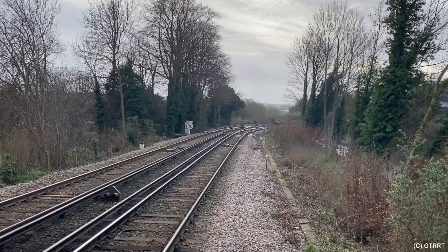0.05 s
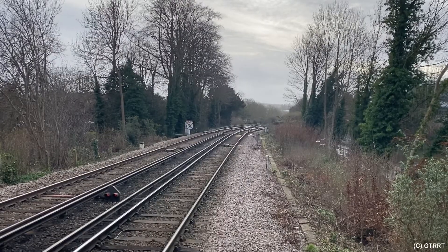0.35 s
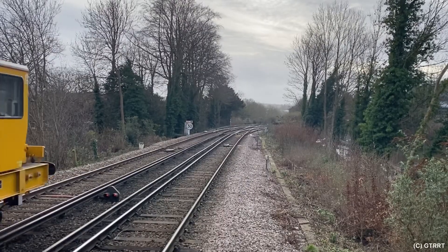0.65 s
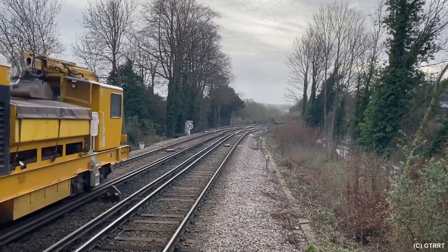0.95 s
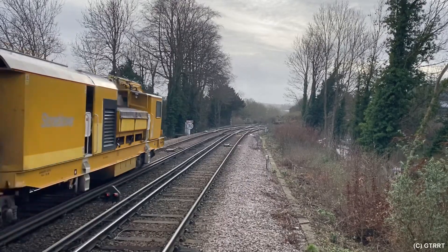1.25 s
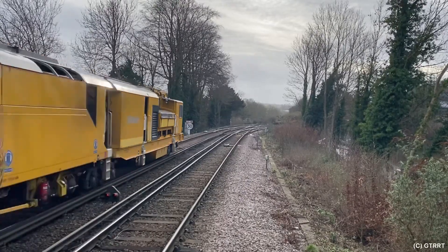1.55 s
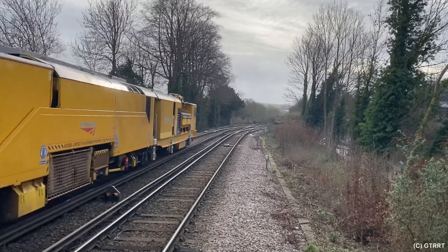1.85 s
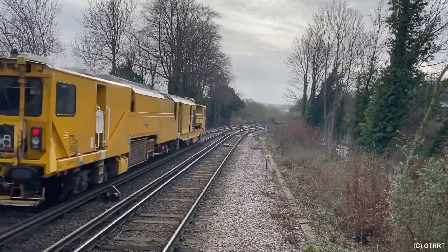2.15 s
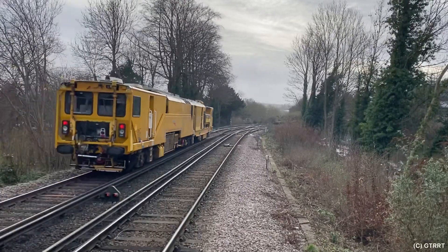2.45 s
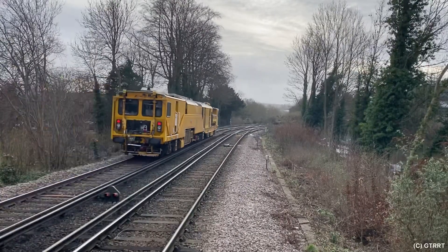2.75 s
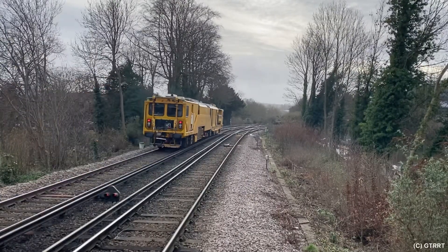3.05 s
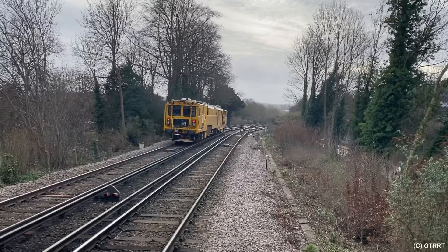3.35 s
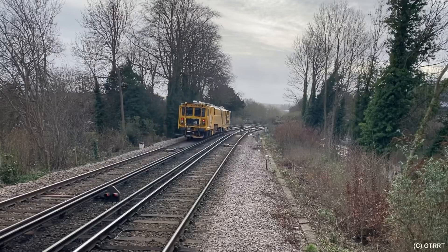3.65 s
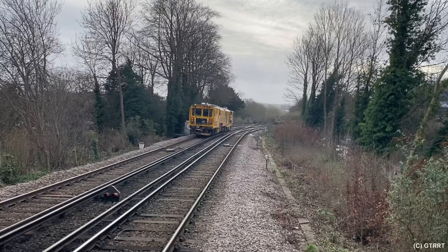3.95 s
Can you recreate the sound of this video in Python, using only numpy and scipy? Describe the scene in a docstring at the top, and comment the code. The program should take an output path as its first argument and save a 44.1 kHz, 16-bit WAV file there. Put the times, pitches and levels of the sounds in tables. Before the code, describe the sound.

A heavy train rumbles past close by with clattering wheels, then fades into the distance.

```python
"""A passing track maintenance train

Wheels roar and hiss on rough rails and thump over joints as the train passes a phone and runs away.
The diesel and its cooling fan sink in pitch by the Doppler effect. A sharp hiss spits out at the
first bogie, the wheel flanges squeal briefly from friction, and steel clacks far down the line."""
import sys
import numpy as np
from scipy import signal
from scipy.fft import rfft, irfft, next_fast_len
from scipy.io import wavfile
from scipy.ndimage import uniform_filter1d, map_coordinates

SR = 44100
rng = np.random.default_rng(int(sys.argv[2]) if len(sys.argv) > 2 else 0)


def wrap_up_sound(samples):
    """Save the sound to the file named by the first command line argument, as 16-bit audio."""
    columns = np.atleast_2d(samples).T
    # keep every value between -1 and 1, then stretch to whole-number steps
    tamed = np.clip(columns, -1, 1)
    steps = np.round(tamed * 32767).astype(np.int16)
    wavfile.write(sys.argv[1], SR, steps)


N = 176400

# spectrum of the spitting hiss and the steel ticks (frequency [Hz], level [dB])
BRIGHT_SPECTRUM = [(500, -29), (1200, 2.5), (5500, 2.5), (15500, -7)]


def amp(db):
    """Decibels to amplitude ratio."""
    return 10 ** (np.asarray(db) / 20)


def unit(x):
    """Normalisation to rms 1."""
    return x / np.sqrt(np.mean(np.abs(x) ** 2) + 1e-20)


def seconds():
    """The time of each sample."""
    return np.arange(N) / SR


def along(points, hz):
    """Interpolation of (frequency [Hz], value) points on a logarithmic axis."""
    f, v = np.transpose(points)
    return np.interp(np.log(hz + 1), np.log(f + 1), v)


def curve(points):
    """Linear interpolation of (time [s], value) points at each sample."""
    return np.interp(seconds(), *np.transpose(points))


def wobble(rate):
    """Smooth random modulation with rate knots a second."""
    return map_coordinates(rng.standard_normal(4096), [seconds() * rate], mode="wrap")


def filtered(x, response):
    """Linear filtering: the spectrum of x times a frequency response."""
    m = next_fast_len(N + 8192)
    return irfft(rfft(x, m) * response(np.fft.rfftfreq(m, 1 / SR)), m)[..., :N]


def rush(spectrum, patchy_db):
    """Coloured noise, direct and scattered, modulated in random patches of time and frequency."""
    bins = signal.stft(rng.standard_normal((2, N)), nperseg=1024)[2]
    patches = uniform_filter1d(rng.standard_normal(bins.shape[1:]), size=4, axis=0)
    patches = uniform_filter1d(patches, size=10, axis=1)
    pair = signal.istft(bins * amp(patchy_db * unit(patches)), nperseg=1024)[1][:, :N]
    return unit(filtered(pair, lambda hz: amp(along(spectrum, hz))))


def tone(hz, rough, width_hz):
    """A partial, direct and scattered; rough is the share of its power in narrow-band noise."""
    flutter = np.array([unit(wobble(width_hz) + 1j * wobble(width_hz)) for _ in range(2)])
    clean = np.array([[1], [1j]]) * np.exp(2j * np.pi * rng.random())
    carrier = np.exp(2j * np.pi * np.cumsum(hz) / SR)
    return unit(np.real((np.sqrt(1 - rough) * clean + np.sqrt(rough) * flutter) * carrier))


def burst(start, attack, hold, decay):
    """Linear attack, hold, then exponential damping by 60 dB in the decay time; all in seconds."""
    t = seconds() - start
    return np.clip(t / attack, 0, 1) * amp(-60 * np.maximum(t - attack - hold, 0) / decay)


def steady(x):
    """Division by the running rms evens out the chance swells of noise."""
    return x / np.sqrt(np.abs(uniform_filter1d(x ** 2, size=300, axis=-1)) + 1e-20)


def near_and_far():
    """Equal-power gains for the train heard from the side and, once its tail passes, from behind."""
    tail_s, fade_s = 2.02, .3
    turn = np.pi / 4 * (1 + np.tanh((seconds() - tail_s) / fade_s))
    return np.cos(turn), np.sin(turn)


def doppler():
    """Doppler effect: the frequency ratio falls as the engine bay approaches, passes and recedes."""
    abreast_s, distance_m = 1.05, 7.5
    speed, sound_speed = 25, 343  # m/s
    position_m = speed * (seconds() - abreast_s)
    return 1 / (1 + speed / sound_speed * position_m / np.hypot(position_m, distance_m))


def rolling():
    """Rail roughness excites broadband noise: ground rumble, wheel roar, rail hiss and fine fizz."""
    # spectral densities (frequency [Hz], level [dB])
    rumble_spectrum = [(10, -55), (25, -12), (42, -4), (62, 7.5), (85, 0), (125, 1), (165, -3), (320, -56)]
    near_spectrum = [(110, -42), (190, -2), (400, -2), (600, -2.5), (800, -4.5), (950, -8), (1250, -6.5),
                     (1700, -13), (2400, -15), (4200, -63)]
    far_spectrum = [(110, -41), (190, -3.5), (380, -2), (640, -4), (800, -7), (930, -10), (1600, -10),
                    (2200, -13), (2500, -22.5), (4000, -87)]
    hiss_spectrum = [(1700, -39), (2700, 1.5), (3600, -3), (7000, -7.5), (8500, -19.5), (11500, -65)]
    fizz_spectrum = [(5500, -37), (7800, -2), (9800, 4.5), (11000, -2.5), (13000, -7), (15500, -13.5)]
    # envelopes (time [s], level [dB])
    rumble_level = [(0, -22), (.3, -20.5), (.6, -26), (.9, -23), (1.3, -28), (1.9, -28.5), (2.4, -33.5),
                    (2.8, -34), (3.2, -37.5), (4, -40)]
    roar_level = [(0, -17), (.65, -16.5), (1.15, -17.5), (1.4, -20), (1.9, -21.5), (2.05, -26.5),
                  (2.4, -28), (2.7, -29), (3, -33.5), (3.3, -31), (3.6, -34.5), (4, -35)]
    hiss_level = [(0, -30), (1.17, -30.5), (1.45, -34), (1.85, -35.5), (2.4, -45.5), (2.7, -45.5),
                  (3, -47.5), (4, -52.5)]
    fizz_level = [(0, -48.5), (.22, -44.5), (.55, -37.5), (.66, -45), (.87, -40.5), (1.18, -37),
                  (1.45, -43), (1.95, -45), (2.08, -51.5), (2.5, -54.5), (4, -65.5)]
    near, far = near_and_far()
    shake = wobble(34.6)  # the rough rail makes the level flicker
    rumble = rush(rumble_spectrum, patchy_db=1) * amp(curve(rumble_level))
    roar = near * rail_resonance(rush(near_spectrum, patchy_db=1.43))
    roar += far * rail_resonance(rush(far_spectrum, patchy_db=1.43))
    roar *= amp(curve(roar_level) + .42 * shake)
    hiss = rush(hiss_spectrum, patchy_db=2.5) * amp(curve(hiss_level) + .5 * shake)
    fizz = rush(fizz_spectrum, patchy_db=3) * amp(curve(fizz_level) + .5 * shake + .37 * wobble(200))
    return rumble + roar + hiss + fizz


def rail_resonance(x):
    """Resonance: wheels and rails reinforce narrow bands around their natural frequencies."""
    # modes (frequency [Hz], half width [Hz], lift [dB])
    modes = [(262, 5.9, 3.5), (378, 17, 3), (807, 16, 5), (2445, 33, 5)]
    lift_db = lambda hz: sum(db / (1 + ((hz - centre) / width) ** 2) for centre, width, db in modes)
    return unit(filtered(x, lambda hz: amp(lift_db(hz))))


def thumps():
    """Impact excitation: each rail joint shakes the bogie into a damped band of noise."""
    # blows (time [s], level [dB], band centre [Hz], decay [s])
    joints = [(0.048, -11, 260, 0.13), (0.155, -10, 400, 0.065), (0.17, -8.5, 520, 0.066),
              (0.239, -12.5, 455, 0.12), (.29, -10, 270, 0.21), (0.355, -12, 650, 0.067),
              (0.41, -9, 580, 0.11), (.486, -11, 410, 0.098), (0.535, -10, 640, 0.031),
              (2.604, -23.5, 400, 0.027), (3.153, -26, 500, 0.27), (3.236, -30, 696, 0.12)]
    # response of the bogie (frequency [Hz], level [dB])
    bogie = [(50, -16), (150, -14.5), (250, 8), (420, -1), (1150, -1), (1700, -18.5), (9000, -57)]
    half_width_octaves = 1.22
    out = np.zeros((2, N))
    for start, db, centre_hz, decay in joints:
        detuning = lambda hz: np.log2((hz + 1) / centre_hz) / half_width_octaves
        colour = lambda hz: amp(along(bogie, hz)) / (1 + detuning(hz) ** 2)
        envelope = burst(start, attack=.0029, hold=.0085, decay=decay)
        blow = steady(filtered(rng.standard_normal((2, N)), colour)) * envelope
        out += amp(db) * blow * np.linalg.norm(envelope) / np.linalg.norm(blow, axis=1, keepdims=True)
    return out


def diesel():
    """Periodic firing makes a drone of low partials, lowered in passing by the Doppler effect."""
    # partials (multiple of the base frequency, level [dB], roughness [0-1])
    orders = [(2 / 3, -8.5, 0.23), (0.98, 0, 0.16), (8 / 3, -13, 0.54)]
    # envelope (time [s], level [dB])
    level = [(0, -23.5), (.35, -21.5), (.55, -31), (1.08, -18.5), (1.3, -24), (1.9, -38), (2.45, -54.5),
             (2.9, -39), (4, -40)]
    base_hz = 100.56 * doppler()
    drone = sum(amp(db) * tone(k * base_hz, rough, width_hz=22) for k, db, rough in orders)
    return drone * amp(curve(level))


def cooling_fan():
    """The fan whines at harmonics of its Doppler-shifted blade-passing frequency."""
    # partials (harmonic number, level [dB], roughness [0-1])
    harmonics = [(1, -6, 0.22), (2, -0.5, 0.49)]
    # envelope (time [s], level [dB])
    level = [(.6, -49), (1.05, -19.5), (1.62, -21.5), (1.75, -26), (2.15, -31.5), (2.4, -44), (2.58, -36.5),
             (4, -49.5)]
    blade_hz = 392.6 * doppler()
    whine = sum(amp(db) * tone(k * blade_hz, rough, width_hz=95) for k, db, rough in harmonics)
    return whine * amp(curve(level))


def squeals():
    """Friction: a flange grips and holds a note; a rough note is wider and rasps an octave higher."""
    # notes (time [s], hold [s], frequency at rest [Hz], level [dB], roughness [0-1])
    notes = [(0.818, 0.074, 5890, -35, 1), (0.938, 0.094, 1905, -28.5, 0.57),
             (1.025, .09, 1553, -30.5, 0.2), (1.071, .11, 1942, -25, .35), (1.225, 0.048, 1942, -34, .3),
             (1.298, 0.12, 1936, -25.5, 0.34), (1.584, 0.22, 1945, -34, 0.83),
             (2.189, 0.032, 2290, -27, 0.99)]
    width_hz, rasp_db = 340, -14
    glide, out = doppler(), np.zeros((2, N))
    for start, hold, hz, db, rough in notes:
        rasp = rough * amp(rasp_db) * tone(2 * hz * glide, 1, 2 * width_hz)
        note = tone(hz * glide, rough, rough * width_hz)
        out += amp(db) * (note + rasp) * burst(start, attack=.0069, hold=hold, decay=.15)
    return out


def spit():
    """A broadband transient: bright hiss spits from the wheels as the first bogie passes."""
    envelope = burst(start=.27, attack=.008, hold=.043, decay=.41)
    return amp(-23) * rush(BRIGHT_SPECTRUM, patchy_db=-3.5) * envelope


def clacks():
    """Free vibration after impact: distant steel ticks and rings in damped inharmonic modes."""
    # strikes (time [s], ring level [dB], tick level [dB], tick cutoff [Hz])
    strikes = [(3.161, -31.5, -33.5, 3320), (3.239, -23.5, -38, 2500), (3.245, -32, -37, 9000)]
    # modes of the steel (frequency [Hz], level [dB])
    modes = [(470, 0), (1114, -17), (1276, -5), (1588, -4.5)]
    out, attack = np.zeros((2, N)), .0007
    for start, ring_db, tick_db, cutoff_hz in strikes:
        ring = sum(amp(db) * np.sin(2 * np.pi * (hz * seconds() + rng.random((2, 1))))
                   for hz, db in modes)
        colour = lambda hz: amp(along(BRIGHT_SPECTRUM, hz)) / (1 + (hz / cutoff_hz) ** 4)
        tick = unit(filtered(rng.standard_normal((2, N)), colour))
        out += amp(ring_db) * ring * burst(start, attack, hold=0, decay=.13)
        out += amp(tick_db) * tick * burst(start, attack, hold=0, decay=.19)
    return out


def microphones(pair, lead):
    """Two microphones hear direct and scattered sound with partial coherence, unequal phase and level."""
    # likeness of the two channels (frequency [Hz], coherence [0-1])
    coherence = [(60, .97), (800, .9), (2000, .66), (2800, .42), (7200, .4), (9000, .75)]
    # balance (frequency [Hz], left minus right level [dB])
    balance = [(60, -1.5), (270, -2.5), (500, 1), (850, 4), (1500, -5), (2000, -2.5), (3200, 4.5),
               (4200, 1), (5500, 2.5), (7000, -0.5)]
    treble_hz, hz_per_cycle = 7740, 3640  # in the treble the phase lead falls steadily
    turn = lambda hz: np.arccos(along(coherence, hz)) / 2
    direct, scattered = filtered(pair, lambda hz: np.array([np.cos(turn(hz)), np.sin(turn(hz))]))
    sides = np.array([[1], [-1]])

    def response(hz):
        phase = along(lead, hz) - 2 * np.pi * np.maximum(hz - treble_hz, 0) / hz_per_cycle
        gain = amp(sides * along(balance, hz) / 2)
        gain /= np.sqrt(np.mean(gain ** 2, axis=0))
        return gain * np.exp(1j * phase * np.array([[0], [-1]]))
    return filtered(direct + sides * scattered, response)


def scene():
    """Superposition of all sources, heard first from the left, then from far down the line."""
    # phase between the microphones (frequency [Hz], lead of the left [rad])
    lead_near = [(80, -0.5), (550, 1.46), (780, 1.78), (1300, 2.5), (1600, 4.5), (2800, 8), (4100, 6),
                 (5200, 8.5), (7000, 4.5)]
    lead_far = [(80, 0), (1200, 1.03), (2100, 8), (3300, 5.5), (5200, 8), (7000, 4)]
    train = rolling() + diesel() + cooling_fan() + thumps() + spit() + clacks() + squeals()
    near, far = near_and_far()
    return near ** 2 * microphones(train, lead_near) + far ** 2 * microphones(train, lead_far)


def record(dry):
    """Saturation and band limiting: the phone rounds the highest peaks and cuts the top treble."""
    ceiling, top_hz = .92, 15600
    rounded = dry / (1 + (dry / ceiling) ** 8) ** (1 / 8)
    return filtered(rounded, lambda hz: hz < top_hz)


dry = scene()
out = record(dry)
wrap_up_sound(out)
```